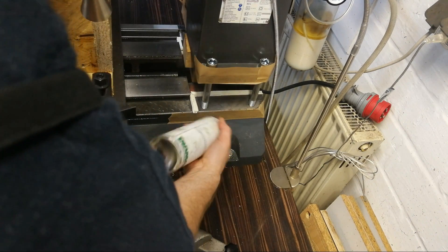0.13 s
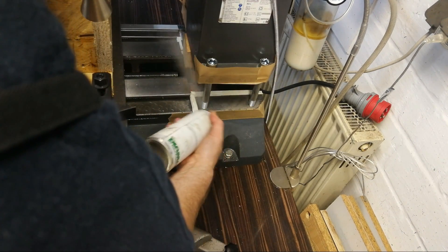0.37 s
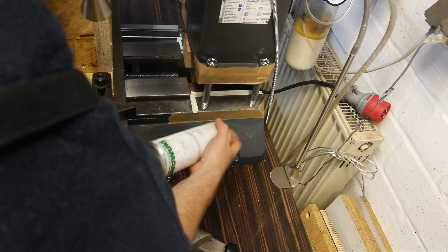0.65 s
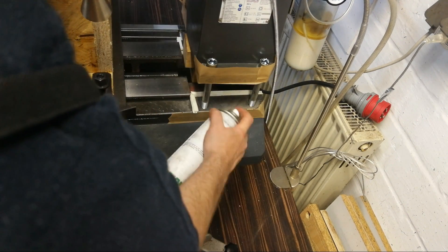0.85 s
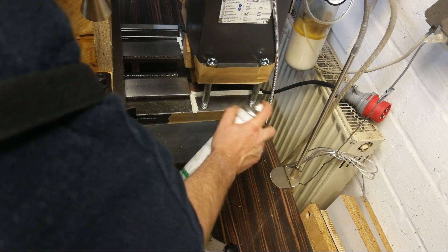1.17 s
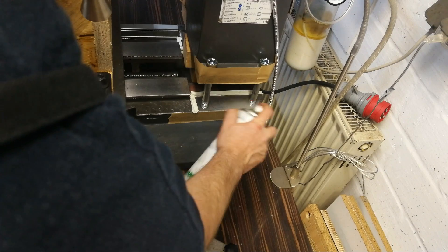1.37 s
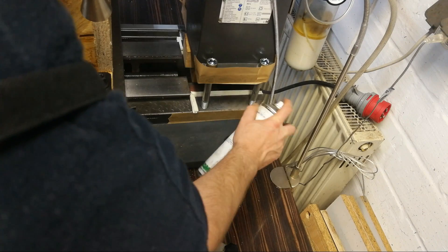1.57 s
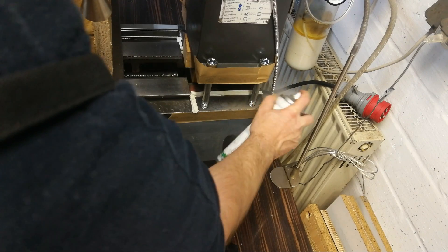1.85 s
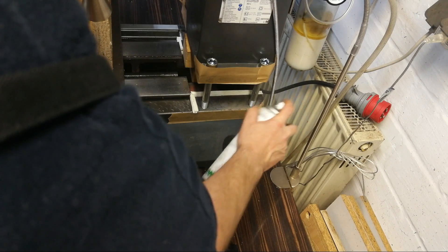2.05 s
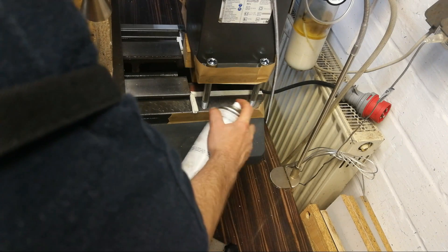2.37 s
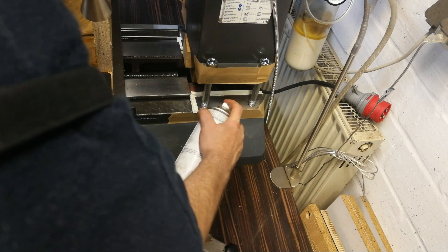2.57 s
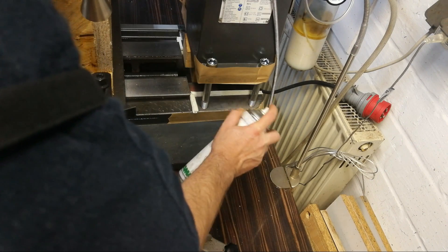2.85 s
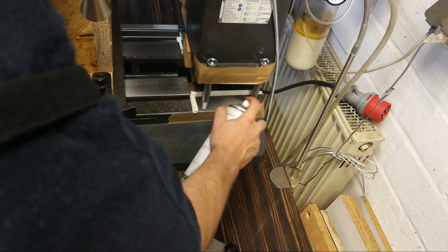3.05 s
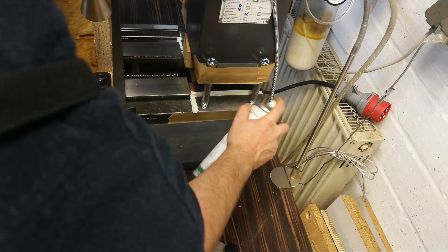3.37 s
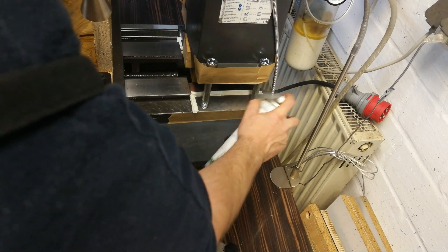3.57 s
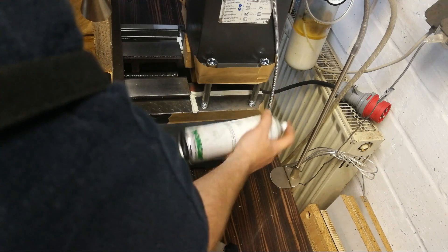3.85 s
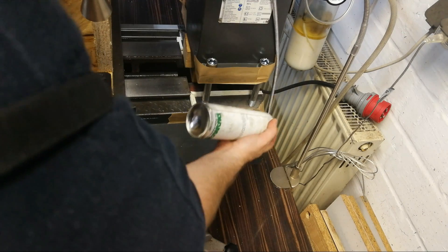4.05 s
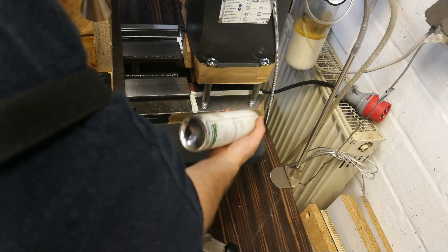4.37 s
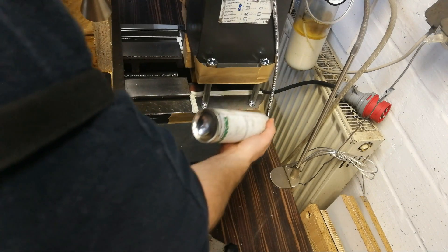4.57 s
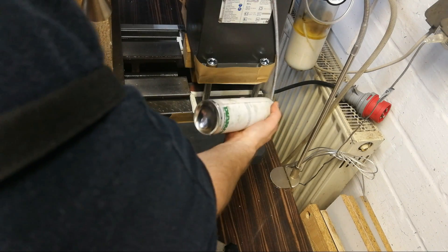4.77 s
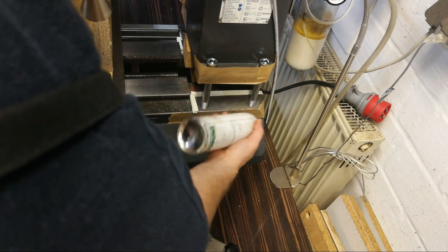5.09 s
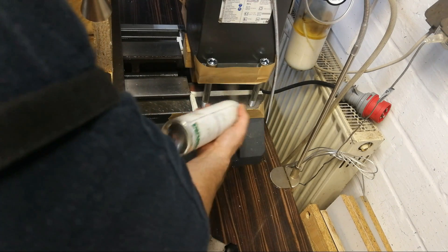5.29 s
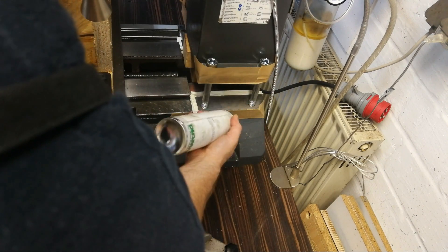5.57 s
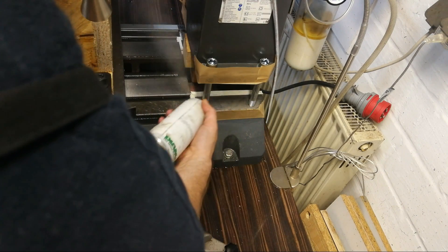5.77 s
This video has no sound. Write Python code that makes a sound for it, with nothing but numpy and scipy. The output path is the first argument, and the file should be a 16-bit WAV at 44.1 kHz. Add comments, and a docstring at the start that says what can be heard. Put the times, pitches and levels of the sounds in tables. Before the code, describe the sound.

Bright metallic ball clatter, then duller muffled knocks, then bright rattling again as an aerosol can is shaken; cloth rustles close by in a small room.

```python
"""A spray paint can is swung to and fro in a small workshop, a little over twice a second.
Its mixing ball clacks on the steel wall and the ringing dome (noise bursts through can resonances, plus
clear notes) and rolls round the rim (runs of tiny knocks). A jacket sleeve brushes past close by (dense
grains of hiss and low noise). A soft bump, moving echoes and a quiet room tone (shaped noise) lie behind."""
import sys
import numpy as np
from scipy import signal
from scipy.fft import rfft, irfft, next_fast_len
from scipy.io import wavfile

SR = 44100
rng = np.random.default_rng(int(sys.argv[2]) if len(sys.argv) > 2 else 0)


def to_wav(sig):
    """Store sig (one row per channel, or 1-D mono) as 16-bit WAV at the path in sys.argv[1].

    Samples outside -1..1 are clipped; the rate is SR.
    """
    pcm = np.clip(np.atleast_2d(sig), -1, 1) * 32767
    pcm = np.round(pcm).astype(np.int16)
    wavfile.write(sys.argv[1], SR, pcm.T)  # frames by channels


N = 261513
TIME = np.arange(N) / SR  # s

# ball strikes the wall: t/s, relative level/dB, note of the struck patch f/Hz,
# hardness of the contact/dB, ring of that note against the level/dB
WALL_HITS = [(0.0528, -24, 4970, -18.5, -18), (0.1008, -27.5, 3540, -8.5, -20),
             (0.1254, -30.5, 3400, -3.5, -17), (0.14, -31, 3420, -4.5, -17),
             (0.1703, -37.5, 1717, 7.5, -2.5), (0.2812, -31.5, 2234, 4, -4), (0.2967, -34.5, 3970, 4, -10),
             (0.3254, -27.5, 3270, 1, -21), (0.3428, -28.5, 3980, -11, -15), (0.3737, -30.0, 3320, -2, -11),
             (0.4836, -32.5, 3380, 1, -8), (0.599, -36, 2400, 0.5, -11), (0.651, -37.5, 1742, 6.5, -3),
             (0.6909, -31, 3270, -4, -12), (0.714, -34.5, 3820, -1.5, -1), (0.7491, -38.5, 2200, 7, -23),
             (0.781, -33, 2730, 4, -12), (1.1321, -30.5, 1766, 0, -13), (1.161, -41.5, 2310, 3, -13),
             (3.3743, -41.5, 2660, 3.5, -13), (3.8268, -37.5, 2050, 5.5, -10), (3.8694, -40, 1830, 4, -10),
             (4.409, -22, 2830, 6.5, -13), (4.501, -29.5, 1864, 2, -12), (4.5802, -36.0, 1445, 10, -12),
             (4.6371, -40, 1686, 7.5, -2.5), (4.6676, -30, 2596, 13.5, -5.5),
             (4.7552, -22, 3480, -7.5, -14), (4.8101, -26, 4100, -7.5, -11), (4.8283, -32, 3520, -2, -5),
             (4.8833, -27.5, 3920, -7.5, -11), (4.9144, -31, 3300, -1, -16), (4.9413, -29, 4160, -12, -18),
             (4.9764, -28.0, 3700, -16, -12), (5.0047, -26.5, 4080, -16.5, -23),
             (5.025, -32, 4120, -12, -27), (5.0455, -27.5, 2850, -6.5, -10.5),
             (5.1, -37.5, 1950, 6.5, -6.5), (5.1461, -39, 1743, 7, -7), (5.1799, -41, 1610, 5, -6.5),
             (5.2037, -45, 1555, 13, -2.5), (5.2364, -24.5, 3490, 2.5, -14), (5.378, -28, 4070, -5, -11),
             (5.4005, -22.0, 3970, -17.5, -14), (5.4859, -33, 2530, 1.5, -6.5),
             (5.5459, -38, 2350, 3.5, -8), (5.6279, -37, 1568, 9.5, -5), (5.6607, -44, 2350, 14, 6.5),
             (5.6927, -21.5, 3640, -2.5, -29), (5.8359, -30, 3510, -6, -16),
             (5.8548, -27.5, 3900, -18, -25), (5.872, -29.5, 3480, -13, -25), (5.894, -38, 3500, -4, -6)]
# resonances of the filled can: f/Hz, width/Hz, relative level/dB
CAN_MODES = [(830, 29, -28), (1257, 81, -23.5), (1640, 130, -11.5), (1724, 345, -15.5), (2402, 280, -1.5),
             (2580, 473, -2.5), (3450, 650, -6), (4106, 480, 0), (4816, 880, -0.5), (5197, 1140, -0.5),
             (6230, 890, -5.5), (7880, 1010, -7), (9240, 1130, -4.5), (13900, 3000, -8)]
# parts of the can's range, each with its own strength and decay in a blow: low f/Hz, high f/Hz
CAN_BANDS = [(700, 1400), (1400, 2000), (2000, 3000), (3000, 5300), (5300, 8000), (8000, 16000)]
# share of a blow's hardness that reaches each of the CAN_BANDS: share [ratio]
HARDNESS_SHARE = [0.19, 0.19, 0, .4, 0.89, 0.93]


def from_db(db):
    """Decibels to gain."""
    return 10 ** (np.asarray(db) / 20)


def rms_one(x):
    """Scale to unit power."""
    return x / np.sqrt(np.mean(x ** 2) + 1e-20)


def at_hz(points, hz):
    """Read a table of values against frequency on a log-frequency axis."""
    known_hz, values = np.transpose(points)
    return np.interp(np.log(np.maximum(hz, 1)), np.log(known_hz), values)


def band(x, low, high):
    """Causal band-pass between two frequencies in Hz."""
    sections = signal.butter(3, [low, min(high, .45 * SR)], "band", fs=SR, output="sos")
    return signal.sosfilt(sections, x)


def unit_in_band(x, low, high):
    """Scale so that one band has unit power."""
    return x / np.sqrt(np.mean(band(x, low, high) ** 2) + 1e-20)


def resonance(x, hz, width):
    """Two-pole resonance with gain 1 on top; a narrower width in Hz rings longer."""
    radius = np.exp(-np.pi * width / SR)
    feed = np.array([1, 0, -1]) * (1 - radius * radius) / 2
    return signal.lfilter(feed, [1, -2 * radius * np.cos(2 * np.pi * hz / SR), radius * radius], x)


def colour(x, spectrum):
    """Filter a sound by a smooth spectrum in dB."""
    size = next_fast_len(N + SR // 10)
    gain = from_db(at_hz(spectrum, np.fft.rfftfreq(size, 1 / SR)))
    return irfft(rfft(x, size) * gain, size)[..., :N]


def wobble(per_s, depth_db):
    """A gain that wanders between random levels, drawn per_s times a second."""
    return from_db(depth_db * np.interp(TIME * per_s, np.arange(N), rng.standard_normal(N)))


def grains(per_s, spread_db):
    """Tiny contacts at random moments, a few much stronger than the rest."""
    sizes = from_db(spread_db * np.minimum(rng.exponential(1, N), 4)) * rng.choice([-1, 1], N)
    return rms_one(sizes * (rng.random(N) < per_s / SR))


def stroke(start_s, length_s, attack_db_per_s, release_db_per_s, sag_db=0):
    """Gain of one movement: attack, a hold that arches in the middle, release."""
    t = TIME - start_s
    phase = np.clip(t / length_s, 0, 1)
    attack_db = attack_db_per_s * np.minimum(t, 0)
    release_db = -release_db_per_s * np.maximum(t - length_s, 0)
    db = attack_db + release_db - sag_db * (2 * phase - 1) ** 2
    return from_db(np.maximum(db, -200))


def can(force, shell_db, spots_db):
    """The can's resonances over a bed of dense shell modes; spots_db is each contact's leaning to each mode."""
    out = from_db(shell_db) * band(force, 1100, 16000)
    for k, (hz, width, db) in enumerate(CAN_MODES):
        strength = (-1) ** k * from_db(db + spots_db[..., k])
        # transposed so that each blow meets its own strength
        out = out + (resonance(force, hz, width).T * strength).T
    return out


def dome(force):
    """The stiff domed end has one clear note."""
    return resonance(force, hz=4650, width=67)


def strikes(times, bands_db, t60, rise_s, dome_db, shell_db, spot_db):
    """Each blow scatters round the thin shell as a burst that paint and hand damp quickly."""
    crack_db, crack_s = -0.5, 0.0011  # the first contact stands out of its burst as a short crack
    t = np.arange(SR // 8) / SR
    scatter = rng.standard_normal((len(times), 2, len(t))) * (1 - np.exp(-t / rise_s))
    # each point of contact may favour other modes
    spots_db = spot_db * rng.standard_normal((len(times), len(CAN_MODES)))
    clacks = 0
    for k, (low, high) in enumerate(CAN_BANDS):
        decay = from_db(-60 * t / t60[k])
        force = scatter * (decay + from_db(crack_db) * np.exp(-t / crack_s))
        part = band(can(force, shell_db, spots_db) + from_db(dome_db) * dome(force), low, high)
        # bands_db sets the level over the first 10 ms
        attack = np.sqrt(np.mean(part[..., :SR // 100] ** 2, axis=(1, 2)))
        clacks = clacks + part * (from_db(bands_db[:, k]) / attack)[:, None, None]
    out = np.zeros((2, N + len(t)))
    for s, clack in zip(times, clacks):
        start = max(round(s * SR), 0)
        out[:, start:start + len(t)] += clack
    return out[:, :N]


def wall_clacks(band_db):
    """The point of contact sets the pitch of a clack, its hardness adds the treble."""
    below_db_per_octave, above_db_per_octave = 19.5, 6  # the can answers less away from the favoured pitch
    s, db, hz, hardness_db, _ = np.transpose(WALL_HITS)[..., None]
    octaves = np.mean(np.log2(CAN_BANDS), axis=1) - np.log2(hz)
    place_db = below_db_per_octave * np.minimum(octaves, 0) - above_db_per_octave * np.maximum(octaves, 0)
    bands_db = db + band_db + place_db + hardness_db * HARDNESS_SHARE
    return strikes(s[:, 0], bands_db, t60=[0.052, 0.07, 0.053, 0.056, 0.063, 0.051], rise_s=0.0005,
                   dome_db=-17, shell_db=-20, spot_db=0.0)


def pings(beat_hz):
    """The struck patch rings on with a thin clear note, a close pair of modes that beat as they fade."""
    ping_cycles = 128  # cycles to fall by 60 dB, so the low notes last longest
    t = np.arange(SR // 3) / SR
    out = np.zeros((2, N + len(t)))
    all_phases = rng.uniform(0, 2 * np.pi, (len(WALL_HITS), 2, 2, 1))
    for (s, db, hz, _, ring_db), phases in zip(WALL_HITS, all_phases):
        lower = np.sin(2 * np.pi * hz * t + phases[0])
        upper = 2.6 * np.sin(2 * np.pi * (hz + beat_hz) * t + phases[1])
        fade = from_db(db + ring_db - 60 * t * hz / ping_cycles)
        start = round(s * SR)
        out[:, start:start + len(t)] += (lower + upper) * fade * (1 - np.exp(-t / 0.00025))
    return out[:, :N]


def dome_clacks(band_db):
    """Paint pooled on the dome cushions the gentle blows most, and the dome's note leads."""
    # ball drops on the dome: t/s, relative level/dB
    dome_hits = [(1.3014, -24.5), (1.3817, -27.5), (1.4542, -30), (1.498, -35), (1.632, -34.5),
                 (1.6922, -39), (2.0355, -35), (2.0483, -38), (2.135, -51.5), (2.255, -55.5),
                 (2.447, -47.5), (2.8546, -43), (2.9124, -49.5), (3.7276, -45)]
    # a blow of the plain level has the plain colour; each dB more adds this much hardness
    plain_db, hardness_per_db = -35, 0.29
    s, db = np.transpose(dome_hits)[..., None]
    bands_db = db + band_db + hardness_per_db * (db - plain_db) * HARDNESS_SHARE
    return strikes(s[:, 0], bands_db, t60=[0.04, 0.038, 0.058, .055, 0.048, 0.069], rise_s=0.00085,
                   dome_db=10, shell_db=-17.0, spot_db=-1.5)


def rolling(per_s, spread_db, wall_db, dome_db, dome_ring_db, wall_ring_db, ring_width_hz):
    """The rolling ball skips through the paint in a run of tiny knocks on the wall and round the rim."""
    # ball rolls: t/s, length/s, relative wall level/dB, relative dome level/dB
    rolls = [(0.516, 0.045, -43, -53), (0.69, 0.038, -47.5, -50), (0.81, 0.066, -51, -50),
             (1.147, 0.06, -39.5, -54), (1.22, 0.1, -51.5, -64), (1.396, 0.065, -53, -41.5),
             (1.47, 0.031, -50, -37), (1.525, 0.031, -45, -60), (1.654, 0.056, -45, -44),
             (1.957, 0.034, -52.5, -72), (1.995, 0.055, -45.5, -41), (2.449, 0.02, -54.5, -48),
             (2.852, 0.018, -50, -59), (3.001, 0.049, -70, -58), (3.26, 0.054, -52.5, -58),
             (3.38, 0.022, -45, -40.5), (3.834, 0.086, -42, -42), (4.125, 0.14, -56.5, -64),
             (4.514, 0.03, -49, -65), (5.062, 0.23, -52, -67.5), (5.482, 0.11, -50, -64),
             (5.88, 0.058, -51.5, -51)]
    # wall modes that the rolling ball keeps ringing: f/Hz, relative level/dB
    roll_modes = [(810, -14), (1200, -1.5), (1510, -8), (1730, -2), (1950, 5), (2390, -1.5)]
    attack_db_per_s, release_db_per_s = 900, 446
    knocks = np.array([grains(per_s, spread_db) for side in range(2)]) * wobble(130, depth_db=3.0)
    wall_gain, dome_gain = 0, 0
    for s, length, wall_level_db, dome_level_db in rolls:
        gain = stroke(s, length, attack_db_per_s, release_db_per_s)
        wall_gain = wall_gain + from_db(wall_level_db) * gain
        dome_gain = dome_gain + from_db(dome_level_db) * gain
    body = can(knocks, shell_db=-28.5, spots_db=np.zeros(len(CAN_MODES)))
    # soft contacts favour the low modes and keep a few of them ringing
    wall = colour(body, [(800, 3), (1200, 5.5), (1900, 21.5), (2600, -3.5), (4000, -4.0),
                         (8000, -3.5), (15000, -18.0)])
    notes = sum(from_db(db) * resonance(knocks, hz, ring_width_hz) for hz, db in roll_modes)
    wall = rms_one(wall) + from_db(wall_ring_db) * rms_one(notes)
    rim = band(body, 1700, 5100) + from_db(dome_ring_db) * dome(knocks)
    wall, rim = unit_in_band(wall, 1100, 2800), unit_in_band(rim, 3800, 5200)
    return from_db(wall_db) * wall_gain * wall + from_db(dome_db) * dome_gain * rim


def off_the_arm(x, lag_s, sway_s, strength):
    """An echo off the moving arm, its lag wandering at random, sweeps notches through the hiss."""
    lag = lag_s + sway_s * np.interp(TIME * 9, np.arange(N), rng.uniform(-1.0, 1, N))
    return x + strength * np.array([np.interp(TIME - lag, TIME, side) for side in x])


def sleeve(catches_per_s, spread_db, hiss_db, flutter_db, press_s):
    """Threads catch and slip by the thousand while the loose cloth flutters."""
    # sleeve brushes the jacket: t/s, length/s, relative hiss of the weave/dB, relative flutter of the cloth/dB
    swings = [(-0.1, 0.14, -35.5, -54.5), (0.352, 0.16, -38.5, -57.5), (0.523, 0.05, -73, -56),
              (.63, 0.27, -66, -74), (0.921, 0.15, -38, -60), (1.361, 0.14, -39, -59.5),
              (1.783, 0.13, -39, -57.5), (2.65, 0.14, -39.5, -58.5), (3.094, 0.13, -37, -57.5),
              (3.527, 0.14, -38, -59), (4.208, 0.17, -38.5, -59.5), (4.49, 0.075, -66, -68),
              (4.725, 0.2, -39, -59.5), (4.984, .12, -69, -68.5), (5.256, 0.17, -38.5, -58),
              (5.718, 0.13, -41, -56.5)]
    # spectrum of the weave's hiss: f/Hz, relative level/dB
    weave = [(400, -32), (650, -15), (850, -9.5), (1150, -13), (1500, -7.5), (2400, -5), (2900, -6.5),
             (5200, -1), (7000, -2.5), (10000, -.5), (16000, -1.5)]
    # spectrum of the cloth's flutter: f/Hz, relative level/dB
    cloth_spectrum = [(50, -62), (105, -7.5), (150, -14.5), (215, 2.5), (340, 3), (450, -5), (1000, -6)]
    touch_db_per_s, leave_db_per_s = 1308, 361
    # the arm is slower at both ends of a swing; the loose cloth feels this more and follows late
    hiss_sag_db, flutter_sag_db, flutter_lag_s = 6, 7.5, 0.011
    hiss_gain, flutter_gain = 0, 0
    for s, length, weave_db, cloth_db in swings:
        brush = stroke(s, length, touch_db_per_s, leave_db_per_s, hiss_sag_db)
        flap = stroke(s + flutter_lag_s, length, touch_db_per_s, leave_db_per_s, flutter_sag_db)
        hiss_gain += from_db(weave_db) * brush
        flutter_gain += from_db(cloth_db) * flap
    threads = np.array([grains(catches_per_s, spread_db) for side in range(2)])
    threads = off_the_arm(threads, lag_s=0.000762, sway_s=0.000265, strength=0.25)
    hiss = unit_in_band(colour(threads, weave), 10700, 14200) * wobble(250, depth_db=1.23)
    # a light first touch only hisses; the lower rasp comes once the cloth presses
    rasp = colour(hiss, [(1200, 2), (2500, -2), (6000, -22)])
    pressed_gain = np.minimum(hiss_gain, np.interp(TIME - press_s, TIME, hiss_gain))
    rub = (hiss - rasp) * hiss_gain + rasp * pressed_gain * wobble(45, depth_db=2.2)
    flutter = unit_in_band(colour(rng.standard_normal((2, N)), cloth_spectrum), 150, 450)
    return from_db(hiss_db) * rub + from_db(flutter_db) * flutter_gain * flutter


def bump(length_s):
    """The elbow nudges the body: a soft low thud of band-passed noise, alike in both channels."""
    # the nudge: t/s, level/dB
    nudge = (5.35, -59)
    s, db = nudge
    thud = rms_one(band(rng.standard_normal(N), 85, 135))
    return from_db(db) * thud * np.exp(-((TIME - s) / length_s) ** 2)


def echoes(first_echo_s):
    """Dense echoes from walls and machines: noise that fades at its own rate in each band."""
    # the workshop's ring: f/Hz, time to fall by 60 dB/s
    workshop_t60 = [(200, 0.53), (1500, 0.19), (4500, 0.24), (9000, 0.19), (15000, 0.11)]
    t = np.arange(SR // 2) / SR
    edges = np.geomspace(120, 17000, 9)
    tail = 0
    for low, high in zip(edges, edges[1:]):
        fade = from_db(-60 * t / at_hz(workshop_t60, np.sqrt(low * high)))
        tail = tail + band(rng.standard_normal((2, len(t))), low, high) * fade
    tail = tail * np.clip(t / first_echo_s - 1, 0, 1)
    return tail / np.sqrt(np.sum(tail ** 2) / 2)


def workshop(x, first_echo_s, count=4):
    """The can keeps moving, so its sound passes from one pattern of echoes to the next."""
    place = TIME * 5.3 % count  # patterns passed, 5.3 a second
    out = 0
    for k in range(count):
        distance = np.abs((place - k + count / 2) % count - count / 2)
        share = np.sqrt(np.maximum(1 - distance, 0))  # equal-power crossfade
        out = out + signal.fftconvolve(x * share, echoes(first_echo_s), axes=1)[:, :N]
    return out


def room_tone(level_db):
    """The quiet steady floor of the room: noise that falls away towards the treble."""
    # spectrum of the room: f/Hz, relative level/dB
    room_spectrum = [(25, -5), (60, -4), (200, -7.5), (600, -9.5), (2500, -10), (5000, -11), (16000, -21)]
    return from_db(level_db) * rms_one(colour(rng.standard_normal((2, N)), room_spectrum))


def microphone_pair(x):
    """Two close ports hear long waves alike and short waves each in its own way."""
    # what the two ports share: f/Hz, correlation [-1 to 1]
    likeness = [(250, 0.86), (500, -0.23), (1000, 0.23), (2000, 0.032), (4000, -0.029)]
    hz, alike = np.transpose(likeness)
    alike = np.clip(alike, -.95, .95)
    mid = colour(x[0], np.c_[hz, 10 * np.log10((1 + alike) / 2)])
    side = colour(x[1], np.c_[hz, 10 * np.log10((1 - alike) / 2)])
    return np.array([mid + side, mid - side])


def from_the_left(x):
    """Sound from the arm's side is shaded at the right port over most of the range."""
    # balance of the ports: f/Hz, left minus right level/dB
    balance = [(250, -0.5), (500, 4), (1000, 0), (2400, 3.5), (4500, 3.5), (8500, -0.5), (11000, 3),
               (14500, 7.5)]
    hz, lead_db = np.transpose(balance)
    return np.array([colour(x[0], np.c_[hz, lead_db / 2]), colour(x[1], np.c_[hz, -lead_db / 2])])


def scene():
    """Ball, sleeve and their echoes lean left over the room tone and the bump."""
    ball = wall_clacks(band_db=[2.5, -4.5, -1.5, -0.5, 0.0, 0.2])
    ball += dome_clacks(band_db=[-25.5, -17.5, -10.5, -3.0, -11, -11.5])
    ball += pings(beat_hz=36.2)
    ball += rolling(per_s=1100, spread_db=2.5, wall_db=-5.0, dome_db=-10, dome_ring_db=14.5,
                    wall_ring_db=-5, ring_width_hz=51)
    cloth = sleeve(catches_per_s=16000, spread_db=1.0, hiss_db=-1.3, flutter_db=-2.5, press_s=0.0088)
    wet = workshop(from_db(-9) * ball + from_db(-11) * cloth, first_echo_s=0.005)
    floor = microphone_pair(room_tone(level_db=-67.5))
    return from_the_left(microphone_pair(ball + cloth + wet)) + floor + bump(length_s=0.035)


def record(dry):
    """The top is cut steeply above 15950 Hz."""
    return signal.sosfilt(signal.ellip(12, .1, 80, 15950, fs=SR, output="sos"), dry)


dry = scene()
out = record(dry)
to_wav(out)
```